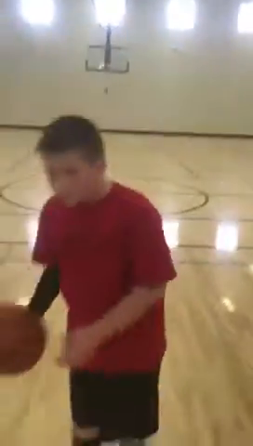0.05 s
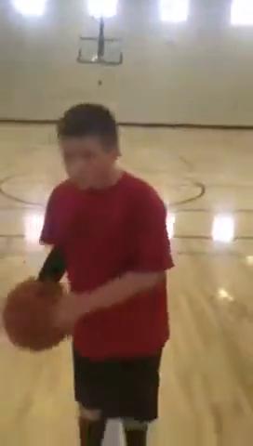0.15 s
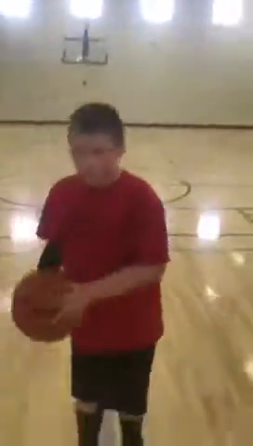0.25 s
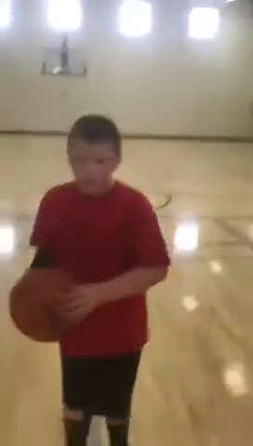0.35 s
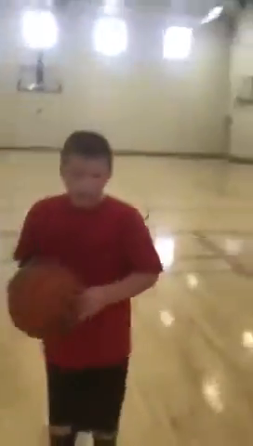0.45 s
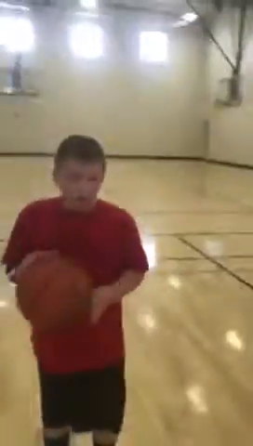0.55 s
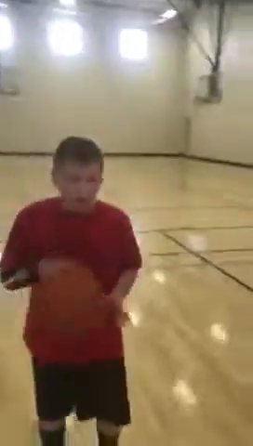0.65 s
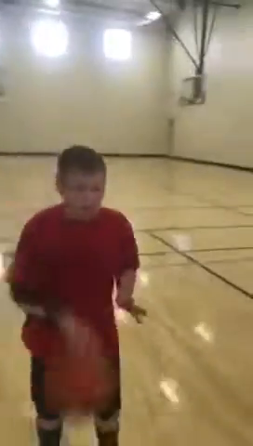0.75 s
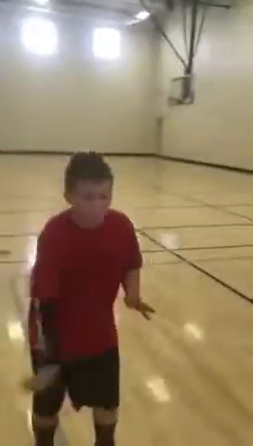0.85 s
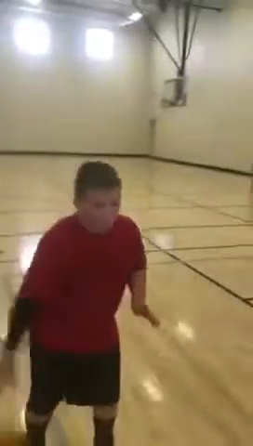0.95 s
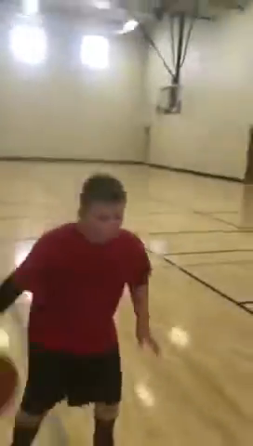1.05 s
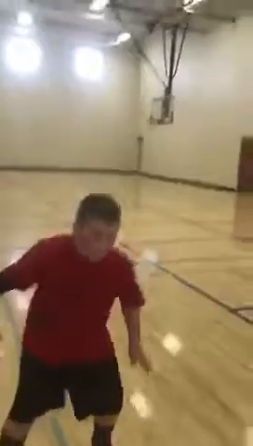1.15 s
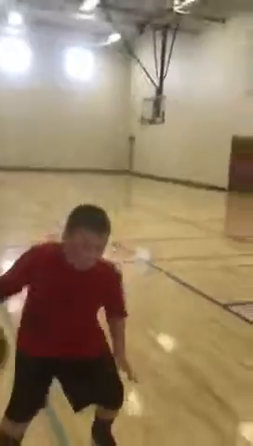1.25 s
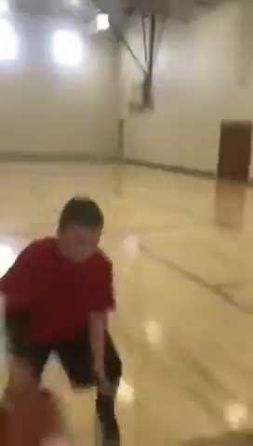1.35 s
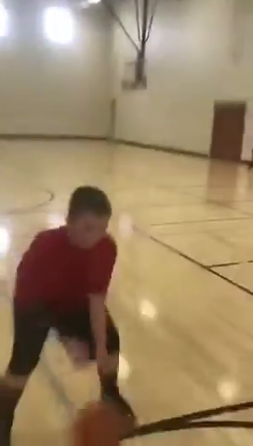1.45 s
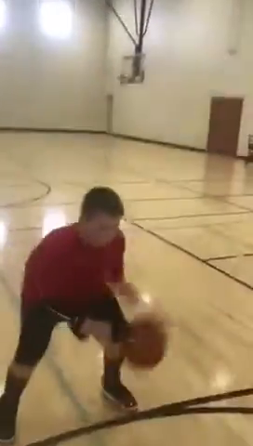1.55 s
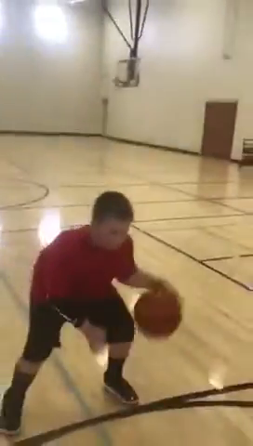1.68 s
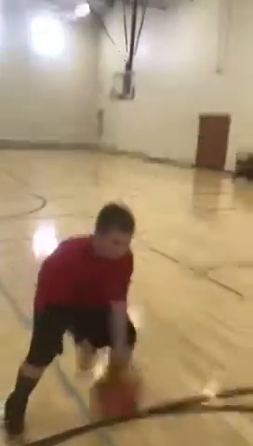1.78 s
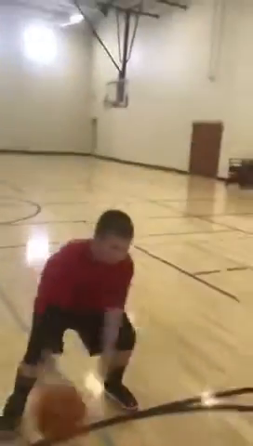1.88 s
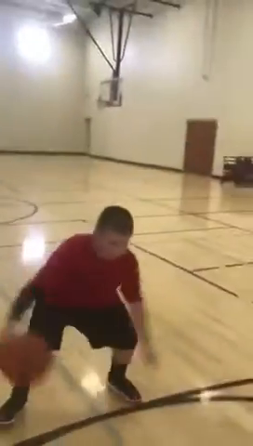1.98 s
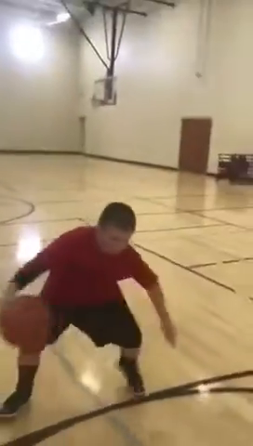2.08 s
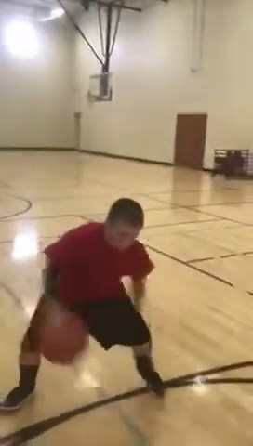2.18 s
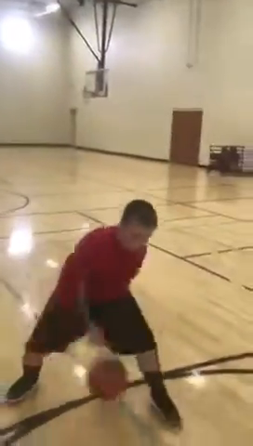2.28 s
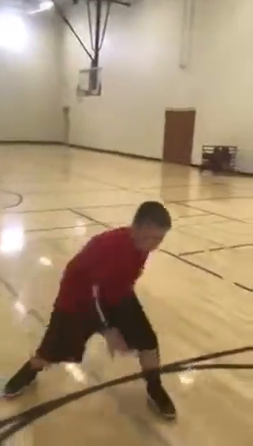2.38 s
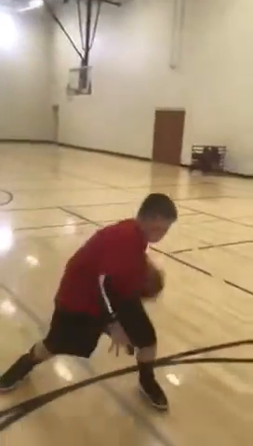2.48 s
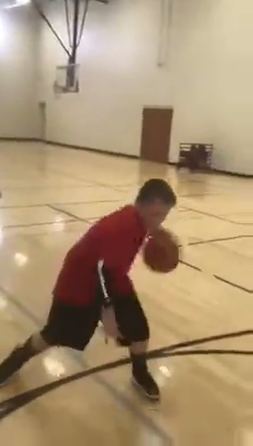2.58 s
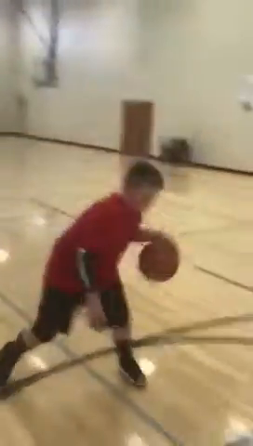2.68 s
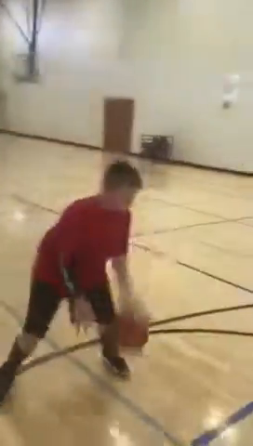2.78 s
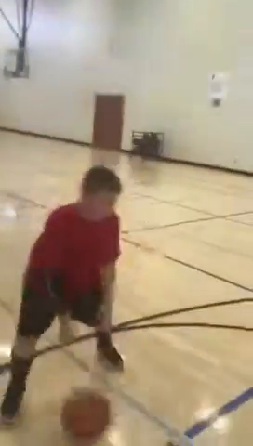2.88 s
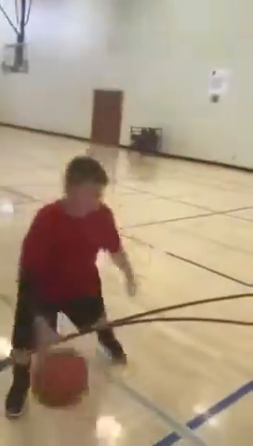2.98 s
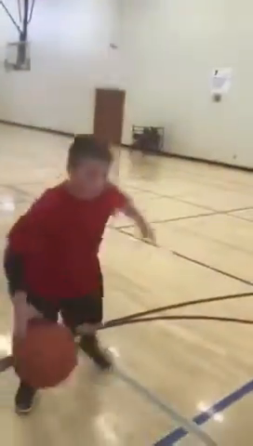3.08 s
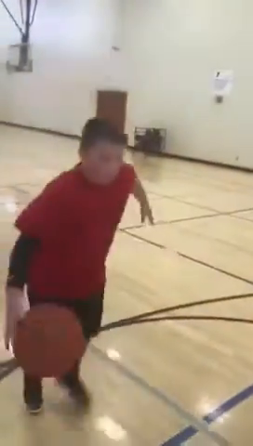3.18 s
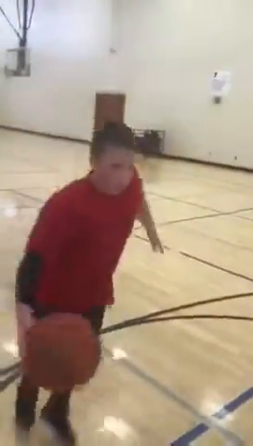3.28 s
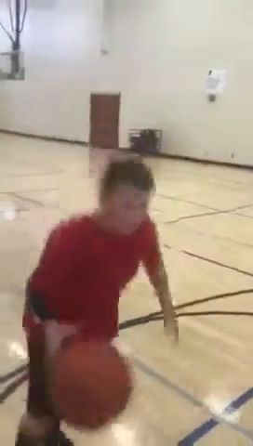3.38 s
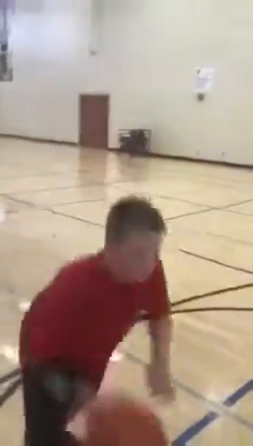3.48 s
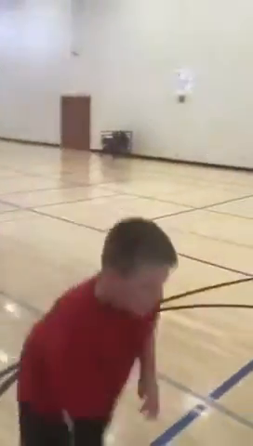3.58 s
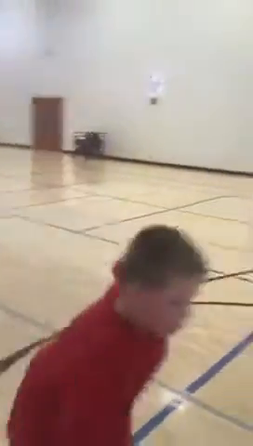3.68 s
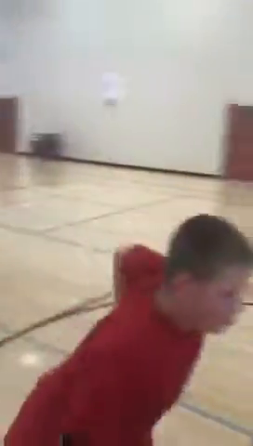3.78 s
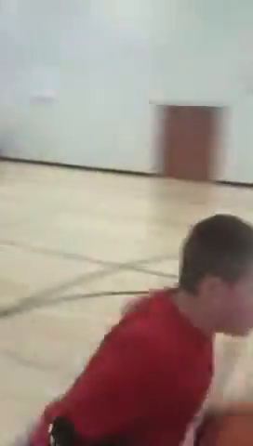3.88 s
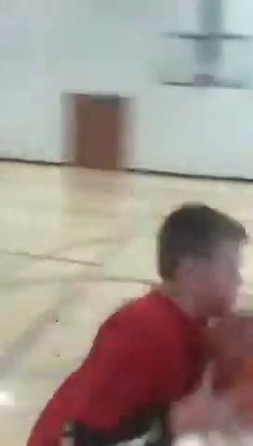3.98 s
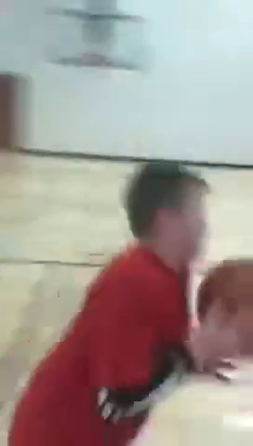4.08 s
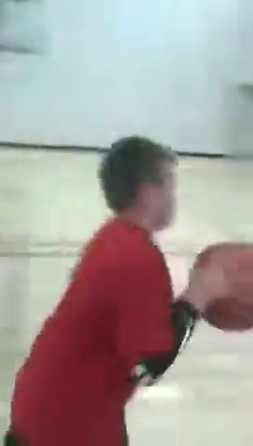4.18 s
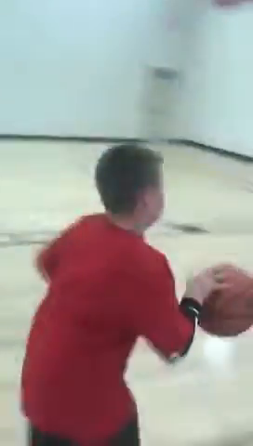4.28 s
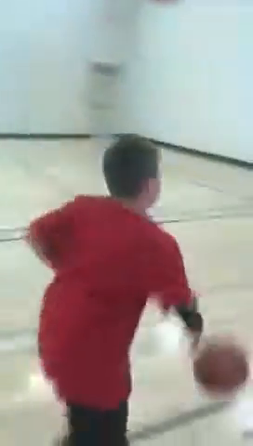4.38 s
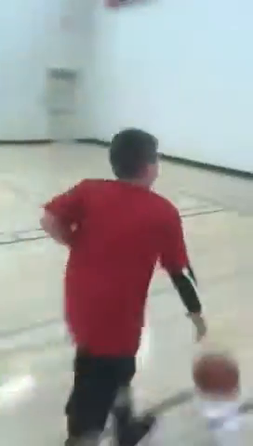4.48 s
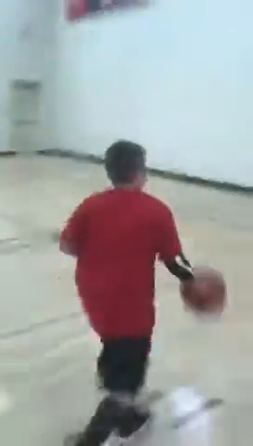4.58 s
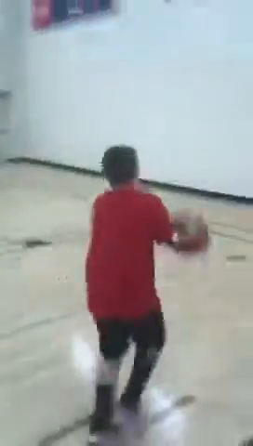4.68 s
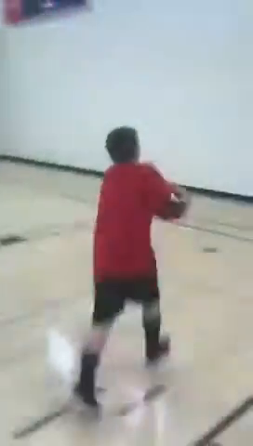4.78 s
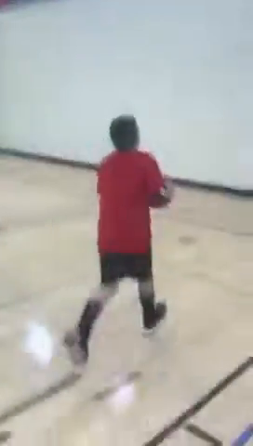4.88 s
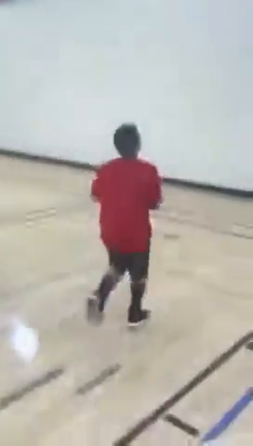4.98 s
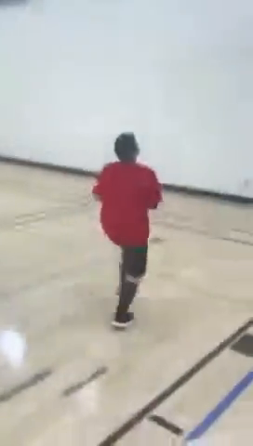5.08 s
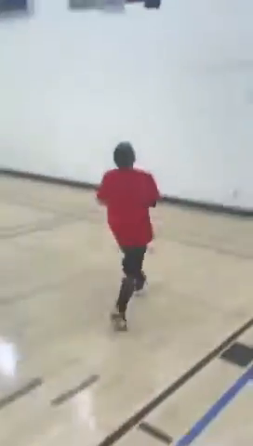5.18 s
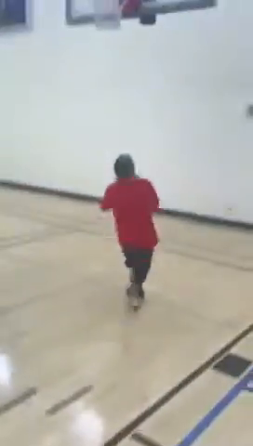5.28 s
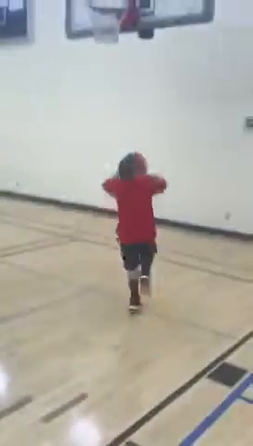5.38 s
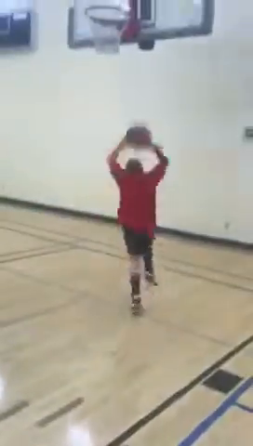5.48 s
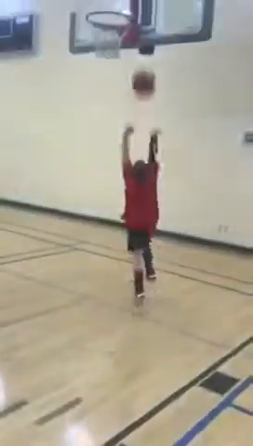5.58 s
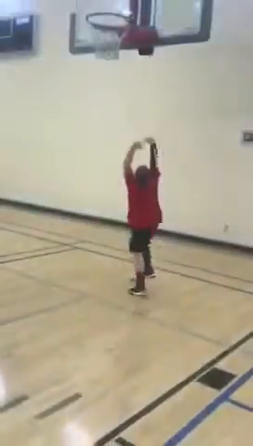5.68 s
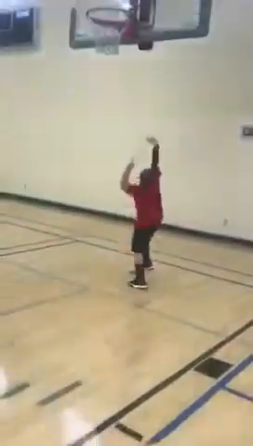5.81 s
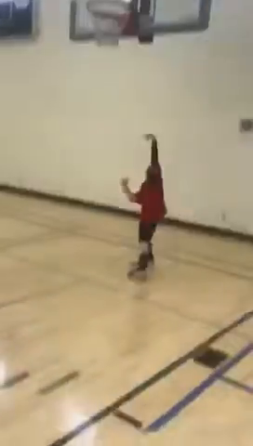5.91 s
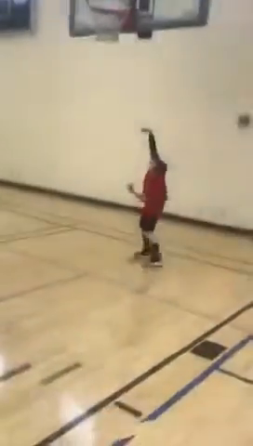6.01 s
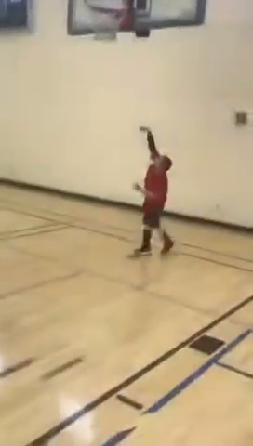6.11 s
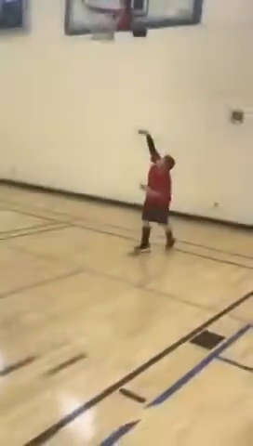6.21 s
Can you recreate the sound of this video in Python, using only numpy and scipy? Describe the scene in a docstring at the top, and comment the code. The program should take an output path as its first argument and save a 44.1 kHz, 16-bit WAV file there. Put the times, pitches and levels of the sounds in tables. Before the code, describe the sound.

A basketball is dribbled on a wooden gym floor close to a phone microphone. Seven bounces come quickly at first, then spread out, each a sharp slap with a low thump and a brief ping that rings on through the large hall. Light taps of hands on the ball and shoes on the boards fall in between. After the last bounce, only a few faint taps and the low ventilation hum remain.

```python
"""Dribbling in a big gym

A basketball hits a sprung wooden floor seven times, close to a phone: each bounce is a sharp slap and a
falling thump, and the hall rings for seconds. Hands and shoes tap in between, and ventilation throbs
underneath. The microphone port rings near 1.8 kHz and a limiter holds the loudest peaks."""
import sys
import numpy as np
from scipy import signal
from scipy.fft import rfft, irfft, next_fast_len
from scipy.io import wavfile
from scipy.ndimage import uniform_filter1d, minimum_filter1d, map_coordinates

SR = 44100
rng = np.random.default_rng(int(sys.argv[2]) if len(sys.argv) > 2 else 0)


def store_pcm(level_fs):
    """Save levels as 16-bit WAV."""
    pcm = np.round(np.clip(level_fs, -1, 1) * 32767).astype(np.int16)
    wavfile.write(sys.argv[1], SR, np.atleast_2d(pcm).T)


N = 275625
T = np.arange(SR // 4) / SR  # the life of one hit [s]

# fan tones, close enough to beat: (pitch [Hz], relative level [dB])
FAN_TONES = [(41.2, -13), (48.7, 0.5), (54.7, 0.5), (58.6, -4), (61.7, 0.5), (87.3, -7.5)]
# the hum's fader ride, weaker in mid-court: (time [s], level [dB])
HUM_RIDE = [(0, -29), (0.798, -29), (1.8, -33.5), (3.5, -33.5), (4.8, -32), (5.6, -29), (6.25, -35)]
# colour of the rushing air: (frequency [Hz], relative level [dB])
RUSH_SPECTRUM = [(20, -30), (35, -12), (50, -8.5), (85, -2.5), (120, 0), (180, -12), (260, -17), (450, -28),
                 (650, -28.5), (1000, -34), (2000, -42.5), (5000, -44.5), (8000, -33), (11000, -50)]
# the hall's diffuse tail: (frequency [Hz], t60 [s], level [dB])
HALL_TAIL = [(30, 1.4, -32), (60, 1.3, -9.5), (130, 0.88, -4), (278, 3.85, -7.5), (487, 4.8, -5.5),
             (630, 8.2, -1), (790, 2.3, -13.5), (1010, 3.4, 4), (1294, 2.5, -7), (1880, 4.5, -5),
             (2360, 3.5, -12), (2920, 3, -4.5), (4160, 3.2, -6.5), (5600, 1.5, -8.5), (8200, 1.7, -0.5),
             (11000, .8, -16.5)]
# echoes off the ceiling and far wall: (delay [s], level [dB], t60 of the smear [s])
WALL_ECHOES = [(0.048, -15.5, 0.1), (.22, -17.5, 0.47)]
# hands on the ball and footfalls, levels before the trims in taps():
# (time [s], click [dB], knock pitch [Hz], knock [dB], scuff t60 [s])
TAP_CUES = [(0.1006, -27, 538, -51.5, 0.027), (0.5675, -28, 600, -48, 0.03),
            (1.864, -24.5, 542, -32.5, 0.012), (2.384, -18.5, 842, -27.5, 0.013),
            (3.535, -25, 396, -49, 0.014), (3.601, -22, 478, -36.5, 0.077),
            (3.6423, -27.5, 355, -60.5, 0.041), (4.368, -26.5, 560, -44, 0.05),
            (4.608, -14.5, 496, -42, 0.023), (5.362, -34.5, 365, -60, 0.023),
            (5.377, -28, 646, -46.5, 0.065), (5.9656, -28.5, 640, -44.5, 0.09)]
# the player's swing around the first bounce: (time [s], strength [0-1])
SWING_ENVELOPE = [(.9, 0), (.98, 1), (1.05, 0), (1.25, 0.7), (1.5, 0.15)]
# ball on floor, levels before the trims in bounce(): (time [s], slap [dB], thump [dB], joists [dB],
# ping pitch [Hz], ping [dB], overtone [dB], board pitch [Hz], board [dB], tick [dB], hall send [dB])
BOUNCE_CUES = [(1.014, -15.5, -13.5, -23, 1766, -16, -10, 676, -24.5, -75.5, 1),
               (1.5619, -12.5, -12.5, -34, 1410, -16, -26.5, 978, -25, -69, -1),
               (1.9654, -10, -13.5, -22.5, 1784, -16, -9, 930, -34, -49, -7),
               (2.4391, -10, -16, -32.5, 1760, -16, -8, 566, -41.5, -44.5, -4),
               (3.0004, -14, -12, -22, 1610, -15.5, -24.5, 877, -25, -67.5, -1),
               (3.7471, -14, -12, -17, 1336, -13.5, -12.5, 725, -21, -75, 1.5),
               (4.574, -14.5, -13, -22, 1400, -10, -18, 735, -23, -75, 3)]
# modes of the air inside the ball: (pitch [Hz], level [dB], t60 [s])
BALL_AIR_MODES = [(1034, -51.5, 0.81), (1380, -53, .3), (1780, -57.5, 0.38), (2280, -59.5, 0.43),
                  (2790, -50, 0.29)]
# resonances of the microphone port and case: (frequency [Hz], gain [dB])
MIC_PORT_EQ = [(600, -2), (950, -3.5), (1400, 4), (1620, 6.5), (1740, 10), (1850, 8.5), (2020, 1.5),
               (2300, -3.5), (2850, 1), (3500, -8.5), (4200, -17.5), (4900, -24.5), (5700, -20.5),
               (7300, -33.5), (10000, -38), (14000, -54.5)]


def amp(db):
    """Decibels to gain."""
    return 10 ** (np.asarray(db) / 20)


def unit(x):
    """Scale to rms 1."""
    return x / np.sqrt(np.mean(x ** 2) + 1e-20)


def along(points, hz):
    """Read a curve of (frequency [Hz], value) points on a log axis."""
    f, v = np.transpose(points)
    return np.interp(np.log(hz + 1), np.log(f + 1), v)


def add(track, s, x):
    """Mix x into the track from time s, which may lie before its start."""
    start = round(s * SR)
    x = x[max(-start, 0):len(track) - start]
    track[max(start, 0):][:len(x)] += x


def equalise(x, points):
    """Minimum-phase EQ through (frequency [Hz], gain [dB]) points."""
    size = 2 * next_fast_len(len(x) // 2 + 4096, True)
    gain = amp(along(points, np.fft.rfftfreq(size, 1 / SR)))
    cepstrum = irfft(np.log(gain))
    cepstrum[1:size // 2] *= 2
    cepstrum[size // 2 + 1:] = 0
    return irfft(rfft(x, size) * np.exp(rfft(cepstrum)))[:len(x)]


def wobble(rate):
    """A smooth random curve, rate knots a second."""
    knots = rng.standard_normal(int(N * rate / SR) + 4)
    return map_coordinates(knots, [np.arange(N) * rate / SR])


def fade(t, t60):
    """Exponential decay by 60 dB in t60."""
    return np.exp(-np.log(1000) * t / t60)


def ring(hz, t60):
    """One damped mode."""
    return np.sin(2 * np.pi * hz * T) * fade(T, t60)


def burst(t60, delay=0):
    """A dying puff of noise with energy 1."""
    x = rng.standard_normal(len(T)) * fade(T, t60)
    return np.pad(x / np.linalg.norm(x), (round(delay * SR), 0))[:len(T)]


def lowpass(x, hz):
    """Roll off the treble."""
    return signal.sosfilt(signal.butter(2, min(hz, SR / 3), fs=SR, output="sos"), x)


def ventilation(drift_hz=0.33, rush_db=-31):
    """The bed: slightly unsteady fan tones beat into a throb over a steady rush of air."""
    tones = 0
    for hz, db in FAN_TONES:
        turns = rng.random() + np.cumsum(hz + drift_hz * wobble(rate=2.51)) / SR
        tones += amp(db) * np.sin(2 * np.pi * turns)
    hum_db = np.interp(np.arange(N) / SR, *np.transpose(HUM_RIDE))
    rush = unit(equalise(rng.standard_normal(N), RUSH_SPECTRUM))
    return amp(hum_db) * unit(tones) + amp(rush_db) * rush


def hall(x, build_s=0.13, onset_dip=0.27, flutter_db=3):
    """The gym's reverb: a fresh diffuse tail that blooms and flutters, plus dull, smeared echoes."""
    hz, t, noise = signal.stft(rng.standard_normal(3 * SR), SR, nperseg=512)
    # bunched reflections make the tail uneven
    patches = uniform_filter1d(rng.standard_normal(noise.shape), size=2, axis=0)
    patches = unit(uniform_filter1d(patches, size=5, axis=1))
    noise = noise * unit(amp(flutter_db * patches))
    band_hz, t60, db = np.transpose(HALL_TAIL)
    life = along(np.c_[band_hz, t60], hz)[:, None]
    gain = amp(along(np.c_[band_hz, db], hz))[:, None] * np.sqrt(2 * np.log(1000) / (life * SR))
    bloom = 1 - onset_dip * np.exp(-t / build_s)
    tail = signal.istft(noise * gain * fade(t, life) * bloom, SR, nperseg=512)[1]
    for delay, echo_db, smear in WALL_ECHOES:
        add(tail, delay, amp(echo_db) * lowpass(burst(smear), hz=4000))
    return signal.fftconvolve(x, tail)


def taps():
    """Palms catch the ball and shoes land: a click and a scuff over a hollow knock and a soft thud."""
    out = np.zeros(N)
    for s, click_db, knock_hz, knock_db, scuff_t60 in TAP_CUES:
        bright_hz = 3200 * amp(1.4 * (click_db + 24))  # harder contact is brighter
        click = amp(click_db + 17) * lowpass(1. * (T == 0), bright_hz)
        click += amp(click_db - 12.5) * ring(hz=2660, t60=0.013)
        knock = amp(knock_db + 12.5) * (ring(knock_hz, 0.025) + 0.75 * ring(120, 0.057))
        scuff = amp(click_db + 18) * lowpass(burst(scuff_t60), bright_hz)
        thud = amp(knock_db + 38.5) * lowpass(burst(0.075), 900)
        add(out, s, click + knock + scuff + thud)
        add(out, s, hall(click + amp(-14.5) * knock))
    return out


def swish(db=-42):
    """Soft brushing that swells as the player swings into the first bounce, again after it, then lingers."""
    stroke = np.interp(np.arange(N) / SR, *np.transpose(SWING_ENVELOPE))
    noise = lowpass(rng.standard_normal(N), 5900)
    return amp(db) * stroke * unit(noise - lowpass(noise, 760))


def thump(first_hz=226, last_hz=63, glide_s=0.0071, swell_s=0.0063, lag_s=0.0012):
    """Bending waves in the sprung floor: the high ones arrive first, so the pitch falls."""
    t = np.maximum(T - lag_s, 0)
    turns = last_hz * t + (first_hz - last_hz) * glide_s * (1 - np.exp(-t / glide_s))
    return np.sin(2 * np.pi * turns) * t / swell_s * np.exp(1 - t / swell_s)


def bounce(slap_db, thump_db, joist_db, ping_hz, ping_db, overtone_db, board_hz, board_db, tick_db):
    """The ball strikes the boards and sets the floor ringing; returns (close sound, hall send)."""
    # the skin slaps the floor and crackles as it spreads out
    slap = amp(slap_db + 25.5) * lowpass(1. * (T == 0), 9000)
    crackle = amp(slap_db + 15) * burst(0.016, delay=0.001)
    # a brief, bright, clipping-like tick on the sharpest bounces
    tick = amp(tick_db + 58.5) * np.diff(burst(0.0036), n=2, prepend=[0, 0])
    # a short ping near 1.3-1.8 kHz; the air inside the ball rings for longer
    ping = amp(ping_db - 0.5) * np.cos(2 * np.pi * ping_hz * T) * fade(T, 0.012)
    overtone = amp(overtone_db) * ring(2660, 0.0048)
    ball_air = sum(amp(db + rng.normal(0, 2.5)) * ring(hz, t60) for hz, db, t60 in BALL_AIR_MODES)
    ball_air *= 1 - T / T[-1]
    # the floor gives way and its joists pick up the motion
    joists = amp(joist_db + 9.5) * ring(242, 0.071) * (1 - fade(T, 0.039))
    floor = amp(thump_db + 6) * thump() - joists
    # loose boards knock at once, rattle, and clap again as the ball lifts off
    knock = amp(board_db - 0.5) * ring(board_hz, 0.046)
    rattle_band = signal.butter(2, [480, 1300], "band", fs=SR, output="sos")
    rattle = amp(board_db + 40.5) * signal.sosfilt(rattle_band, burst(0.057))
    clap = amp(board_db + 30.5) * lowpass(burst(0.0079, delay=0.0093), 2100)
    body = ping + overtone + knock + floor
    close = body + lowpass(slap + crackle, 7700) + tick + ball_air + rattle + clap
    # the hall gets a smoother hit, with less fine grain and less ping
    send = body + slap - 0.41 * ping + amp(-1.5) * ball_air + amp(-3.5) * clap
    return close, send


def dribble():
    """Seven bounces and their reverb; the hall still rings from one just before the start."""
    out = np.zeros(N)
    for s, *hit, send_db in BOUNCE_CUES:
        close, send = bounce(*hit)
        add(out, s, close)
        add(out, s, amp(send_db) * hall(send))
    _, earlier_send = bounce(*BOUNCE_CUES[4][1:-1])
    add(out, -0.3, amp(1.5) * hall(earlier_send))
    return out


def scene():
    """The mono mix: ball and player over the ventilation bed."""
    return (dribble() + taps() + swish() + ventilation())[None]


def record(dry, ceiling=0.66, top_hz=14000):
    """The phone: its port colours the sound, a fast limiter holds the peaks, and the very top is cut."""
    x = equalise(dry[0], MIC_PORT_EQ)
    needed_gain = np.minimum(1, ceiling / (np.abs(x) + 1e-9))
    x = x * uniform_filter1d(minimum_filter1d(needed_gain, size=25), size=25)
    passband = np.fft.rfftfreq(N, 1 / SR) < top_hz
    return irfft(rfft(x) * passband, N)[None]


dry = scene()
out = record(dry)
store_pcm(out)
```